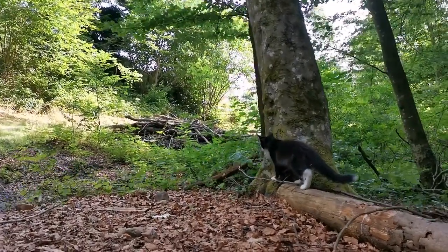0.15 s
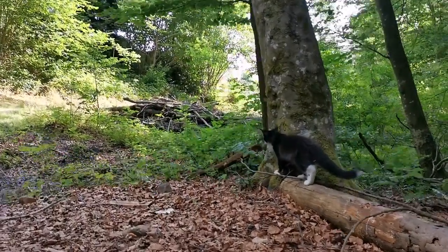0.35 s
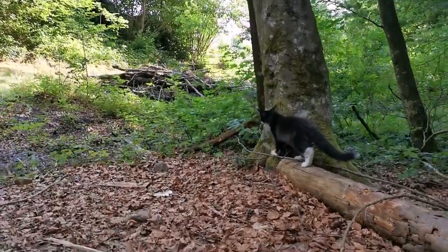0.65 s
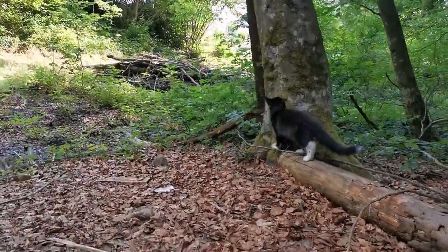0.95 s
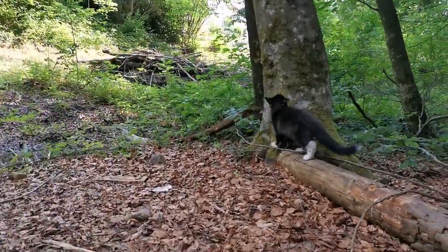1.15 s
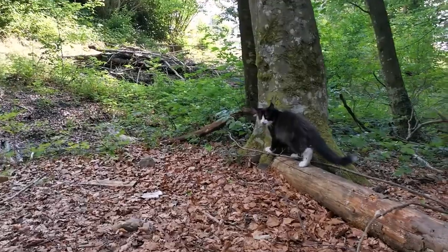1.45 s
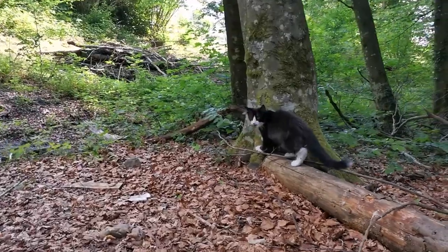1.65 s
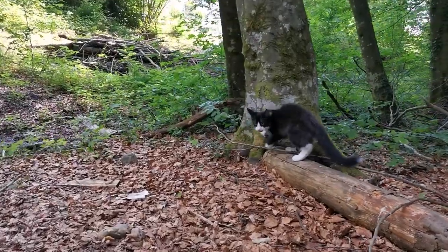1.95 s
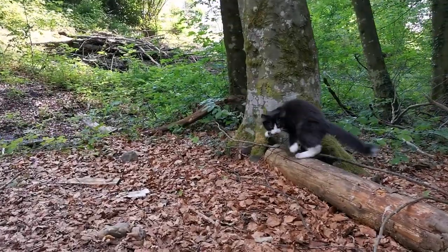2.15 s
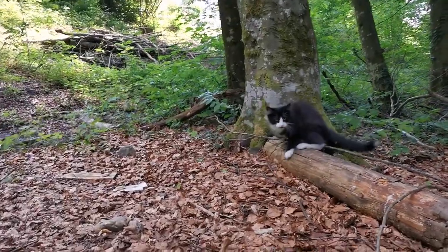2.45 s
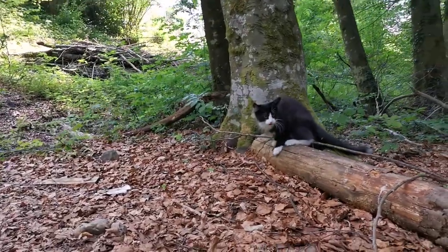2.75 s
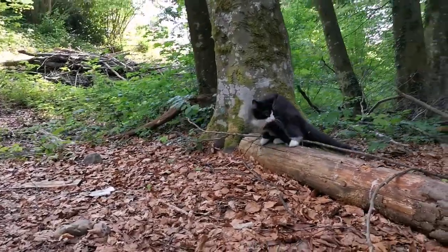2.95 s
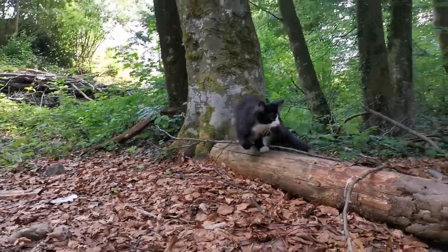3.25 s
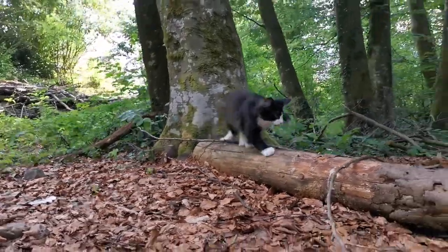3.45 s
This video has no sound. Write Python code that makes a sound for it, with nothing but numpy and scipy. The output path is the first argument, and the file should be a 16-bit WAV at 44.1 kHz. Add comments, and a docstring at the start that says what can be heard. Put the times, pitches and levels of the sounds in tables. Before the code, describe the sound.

Songbird chirping and whistling echoes through a wood, with dry leaf rustles and sharp snaps close by.

```python
"""A wood in light wind: from the start songbirds whistle, their notes smeared by echoes off the trunks.
A few hand knocks on the microphone case come early, and one more near the end.
Feet shift in dry leaves, with rustle, dull pops and sharp snaps; the snaps are strongest late on,
when the bird notes have thinned out. Birds are gliding sines; leaves are filtered clicks and bursts;
pops and knocks are fading sines; wind and hush are filtered noise."""
import sys
import numpy as np
from scipy import signal
from scipy.fft import rfft, irfft
from scipy.io import wavfile

SR = 44100
rng = np.random.default_rng(int(sys.argv[2]) if len(sys.argv) > 2 else 0)


def wrap_up_sound(samples):
    """Save the sound to the file named by the first command line argument, as 16-bit audio."""
    columns = np.atleast_2d(samples).T
    # keep every value between -1 and 1, then stretch to whole-number steps
    tamed = np.clip(columns, -1, 1)
    steps = np.round(tamed * 32767).astype(np.int16)
    wavfile.write(sys.argv[1], SR, steps)


N = 158760  # samples, 3.6 s
PORT_LAG_S = 0.00011  # extra travel time to the farther microphone port


def amp(db):
    """Turn decibels into a plain multiplier."""
    return 10 ** (np.asarray(db) / 20)


def rms_one(x):
    """Scale a sound to an average (rms) strength of 1."""
    return x / np.sqrt(np.mean(x ** 2) + 1e-20)


def in_time(rows):
    """Join the points of a table with straight lines, one curve per column."""
    s, *columns = np.transpose(rows)
    times = np.arange(N) / SR
    return [np.interp(times, s, column) for column in columns]


def colour(x, spectrum, share=1.0, size=8192):
    """Filter with the given (Hz, dB) shape, never sounding before its input (minimum phase)."""
    hz, db = np.transpose(spectrum)
    grid = np.arange(size // 2 + 1) * SR / size + 1
    log_gain = share * np.interp(np.log(grid), np.log(hz), db) * np.log(10) / 20
    # folding the cepstrum forward in time gives the minimum phase
    cepstrum = irfft(log_gain)
    cepstrum[1:size // 2] *= 2
    cepstrum[size // 2 + 1:] = 0
    impulse = irfft(np.exp(rfft(cepstrum)))
    return signal.fftconvolve(np.atleast_2d(x), impulse[None], axes=1)[:, :N]


def lagged(x, lag_s):
    """Make a stereo pair in which the left port hears lag_s later than the right."""
    hz = np.arange(len(x) // 2 + 1) * SR / len(x)
    turn = np.exp(-1j * np.pi * hz * lag_s * np.array([[1], [-1]]))
    return irfft(rfft(x) * turn, len(x))


def drift(rate):
    """Random wandering of spread 1, made by smoothing noise above about rate Hz."""
    r = np.exp(-2 * np.pi * rate / SR)
    noise = rng.standard_normal(N + SR)
    return rms_one(signal.lfilter([1], [1, -2 * r, r * r], noise)[SR:])  # drop the settling second


def add(out, s, sound):
    """Mix a sound into out, starting at s seconds."""
    i = int(max(s, 0) * SR)
    out[..., i:i + sound.shape[-1]] += sound[..., :N - i]


def fading(t60, count):
    """Steady decay that falls 60 dB in t60 seconds."""
    return amp(-60 * np.arange(count) / SR / t60)


# loudness of the far hush, before it wavers: t/s, level/dB
HUSH_LEVEL = [(0, -58.5), (.2, -58), (.5, -60.5), (1.0, -61.5), (1.9, -57.5), (2.1, -60.5), (2.5, -56),
              (3.0, -58.5), (3.6, -58.5)]
# tone of the far hush: f/Hz, level/dB (per Hz)
HUSH_TONE = [(60, -30), (100, -4.5), (300, -11), (700, -13), (1600, -17.5), (2400, -12.5), (3600, -8),
             (4400, -23.5), (5200, -12), (7000, -19.5), (8200, -35), (9500, -51), (12000, -58),
             (14400, -37), (16000, -58)]
HUSH_WAVER_DB, HUSH_WAVER_RATE_HZ = 3.1, 3


def hush():
    """Far hush of the wood: filtered noise, partly shared by both ports, wavering slowly in level."""
    white = rng.standard_normal((3, N))
    mixed = 1.01 * lagged(white[0], -PORT_LAG_S) + 0.56 * white[1:]
    level_db = in_time(HUSH_LEVEL)[0] + HUSH_WAVER_DB * drift(HUSH_WAVER_RATE_HZ)
    return amp(level_db) * rms_one(colour(mixed, HUSH_TONE))


# loudness of the wind on the ports: t/s, level/dB
WIND_LEVEL = [(0.0, -59), (0.13, -56), (0.17, -48.5), (0.38, -57), (0.42, -56), (0.44, -48), (0.47, -60),
              (0.53, -61.5), (0.63, -45.5), (0.67, -59.5), (1.11, -62), (1.13, -48.5), (1.36, -68),
              (1.5, -52), (2.19, -68), (2.31, -46), (2.4, -62), (2.52, -48), (2.76, -71), (2.9, -52),
              (3.25, -53.5), (3.42, -74), (3.45, -49.5), (3.6, -60.5)]
# tone of the wind on the ports: f/Hz, level/dB (per Hz)
WIND_TONE = [(15, -10.5), (30, 2.5), (70, 6), (130, -3), (250, -16.5), (600, -74)]


def wind():
    """Wind lumps at the ports: low rumbling noise, partly shared and partly each port's own."""
    white = rng.standard_normal((3, N))
    mixed = white[0] + 0.82 * white[1:]
    return amp(in_time(WIND_LEVEL)[0]) * rms_one(colour(mixed, WIND_TONE))


# hand knocks on the case: t/s, level/dB, level/dB of the thump relative to that
HAND_KNOCKS = [(0.063, -35, -16), (0.309, -32, -13), (0.413, -17.5, -4), (3.456, -47, 4)]
# ringing tones of the case: f/Hz, level/dB, time to fall 60 dB t/s
CASE_TONES = [(165, -9.5, 0.037), (293, -2, 0.036), (582, 11.5, 0.019), (1140, 3, 0.016), (2180, -10, .01)]
THUMP_HZ, THUMP_T60_S, THUMP_PHASE_S = 75, 0.11, 0.0052  # the last one only shifts the wave's phase
KNOCK_LEFT_DB, KNOCK_RISE_S = -8, 0.0032  # knocks are weaker on the left


def knocks():
    """A hand knock makes the case ring at several fading tones, over one deep fading thump."""
    out, t = np.zeros((2, N)), np.arange(6000) / SR
    ring = np.zeros(len(t))
    for hz, db, t60 in CASE_TONES:
        ring += amp(db) * np.sin(2 * np.pi * hz * t) * fading(t60, len(t))
    thump = np.sin(2 * np.pi * THUMP_HZ * (t - THUMP_PHASE_S)) * fading(THUMP_T60_S, len(t))
    rise = 1 - np.exp(-(t / KNOCK_RISE_S) ** 3)
    for s, db, thump_db in HAND_KNOCKS:
        sides = amp(db + np.array([[KNOCK_LEFT_DB], [0]]))
        add(out, s, sides * (ring + amp(thump_db) * thump) * rise)
    return out


# dull pops in the litter: t/s, level/dB before rise and fade, f/Hz
LITTER_POPS = [(1.001, -44, 1710), (1.373, -30, 530), (1.48, -28, 1610), (1.552, -20, 850),
               (1.596, -28, 1480), (1.606, -35, 1060), (1.64, -18, 1030), (1.695, -22, 1670),
               (2.182, -28.5, 1400), (2.334, -26.5, 1760), (2.945, -35.5, 335), (3.091, -20.5, 1400),
               (3.132, -32, 520)]
POP_CYCLES, POP_RISE_S = 4.8, 0.00041  # a pop falls 60 dB in this many cycles


def pops():
    """A dull pop in the litter is a tone that dies within a few cycles, alike on both sides."""
    out, t = np.zeros((2, N)), np.arange(6000) / SR
    rise = 1 - np.exp(-t / POP_RISE_S)
    for s, db, hz in LITTER_POPS:
        tone = np.sin(2 * np.pi * hz * t) * fading(POP_CYCLES / hz, len(t))
        add(out, s, amp(db) * tone * rise)
    return out


GRAIN_SPREAD_DB, CLUMP_DB, CLUMP_RATE_HZ = 3.5, 3.5, 17


def grains(rate, spectrum, own):
    """Clumped clicks of uneven size; "own" is the share of power that differs between the ports."""
    size_db = GRAIN_SPREAD_DB * np.minimum(rng.exponential(1, (3, N)), 5)
    sizes = amp(size_db) * rng.choice([-1, 1], (3, N))
    happens = rng.random((3, N)) < rate / SR
    clicks = sizes * happens * amp(CLUMP_DB * drift(CLUMP_RATE_HZ))
    shared = lagged(clicks[0], -PORT_LAG_S)  # reaches the left port first
    mixed = np.sqrt(1 - own) * shared + np.sqrt(own) * clicks[1:]
    return rms_one(colour(mixed, spectrum))


# rustle, before the boosts below: t/s, crisp leaf level/dB, dull litter level/dB
RUSTLE_LEVELS = [(0, -102, -83), (.3, -82, -78), (.5, -86.5, -78.5), (.62, -78.5, -75), (.72, -65.5, -61.5),
                 (.8, -77.5, -76.5), (.95, -81, -79.5), (1.27, -101, -79), (1.32, -59, -66.5),
                 (1.39, -71.5, -50.5), (1.43, -74, -65), (1.48, -65, -50), (1.53, -72, -64),
                 (1.62, -66.5, -52.5), (1.72, -70, -67), (1.8, -59, -68.5), (1.85, -72.5, -76),
                 (1.9, -86, -81), (2.2, -84.5, -75.5), (2.47, -75, -87), (2.57, -78, -80),
                 (2.64, -67, -56.5), (2.72, -84, -66.5), (2.8, -94, -71), (2.9, -74.5, -58.5),
                 (3.0, -67.5, -62), (3.1, -71, -57.5), (3.17, -70, -65), (3.27, -84, -74.5),
                 (3.4, -76.5, -73), (3.6, -73.5, -67.5)]
# tone of the crisp leaves: f/Hz, level/dB (per Hz)
LEAF_TONE = [(880, -23), (1500, -9), (2140, -10.5), (3180, -2.5), (4640, 0.5), (5490, -1), (7030, -6),
             (12100, -39.5), (14500, -33), (16000, -63)]
# tone of the dull litter: f/Hz, level/dB (per Hz)
LITTER_TONE = [(200, -37.5), (350, -7.5), (600, -7.5), (1200, -0.5), (1800, -0.5), (3000, -29.5),
               (6000, -29)]
LEAF_BOOST_DB, LITTER_BOOST_DB = 24, 8.5
LEAF_GRAINS_PER_S, LITTER_GRAINS_PER_S = 4000, 1500
LEAF_OWN_SHARE, LITTER_OWN_SHARE = 0.29, 0.05


def rustle():
    """Feet in dry leaves: a crowd of crisp leaf clicks on top, duller litter clicks below."""
    leaf_db, litter_db = in_time(RUSTLE_LEVELS)
    leaves = grains(LEAF_GRAINS_PER_S, LEAF_TONE, LEAF_OWN_SHARE)
    litter = grains(LITTER_GRAINS_PER_S, LITTER_TONE, LITTER_OWN_SHARE)
    return amp(leaf_db + LEAF_BOOST_DB) * leaves + amp(litter_db + LITTER_BOOST_DB) * litter


# snaps of leaves and twigs: t/s, level/dB, level/dB of the dull part relative to that
LEAF_SNAPS = [(0.0756, -41, -12), (0.1293, -30, -28), (0.5084, -27, -33), (0.5186, -30.5, -6),
              (0.5864, -39, -15), (0.8914, -33, -37), (1.4785, -24, -4), (1.5542, -17, -22),
              (1.6147, -42, -8.0), (1.6945, -41, -8.0), (1.7564, -27, -10), (2.184, -34, -5),
              (2.3659, -31.5, -4), (2.627, -25.5, -33), (2.9645, -16.5, -9.5), (2.9834, -22.5, -2),
              (2.9941, -25, -15), (3.0914, -29.5, -15), (3.1343, -19.5, -5), (3.1874, -27, -8.0),
              (3.2253, -24, -27), (3.275, -34, -14), (3.2785, -17, -6), (3.3011, -16.5, -5.5),
              (3.3065, -9.5, 2), (3.3283, -32.5, 7), (3.373, -34, 0), (3.4147, -33.5, 8.5),
              (3.5766, -31, 4)]
# tone of the snaps: f/Hz, level/dB (per Hz)
SNAP_TONE = [(150, -27), (250, -13), (597, -8.5), (906, -21), (1450, -7.5), (3400, -1), (4340, 2),
             (7190, -2), (8400, -22), (14200, -33.5), (16000, -36)]
SNAP_SPLIT_HZ = 4000  # the dull part lies below, the bright part above
SPLINTER_DB, SPLINTER_T60_S = -15, 0.0064
SNAP_TAIL_DB, SNAP_TAIL_T60_S = -46, 0.056
TURN_S = 2.9  # snaps come from the left before this time, from the right after it


def snaps():
    """A snap is a click, a few ms of splinter noise and a faint tail; how dull it is varies."""
    bright, dull = np.zeros((2, N)), np.zeros((2, N))
    noise = rng.standard_normal((len(LEAF_SNAPS), 2048))
    splinters = amp(SPLINTER_DB) * fading(SPLINTER_T60_S, 2048)
    tail = amp(SNAP_TAIL_DB) * fading(SNAP_TAIL_T60_S, 2048)
    click_peak = abs(colour(np.eye(1, 64), SNAP_TONE)).max()
    for (s, db, dull_db), burst in zip(LEAF_SNAPS, noise):
        burst = burst * (splinters + tail)
        burst[0] = -1  # the click itself
        lag_s = PORT_LAG_S * np.sign(s - TURN_S)
        pair = lagged(np.roll(burst, 16), lag_s) / click_peak  # 16 samples of room for the lag
        add(bright, s, amp(db) * pair)
        add(dull, s, amp(db + dull_db) * pair)
    high = signal.butter(2, SNAP_SPLIT_HZ, "high", fs=SR, output="sos")
    low = signal.butter(2, SNAP_SPLIT_HZ, "low", fs=SR, output="sos")
    # subtracting keeps the two parts in step at the split
    return colour(signal.sosfilt(high, bright) - signal.sosfilt(low, dull), SNAP_TONE)


# bird notes: t/s, length t/s, start f/Hz, end f/Hz, warble depth f/Hz,
# level/dB before echoes, left minus right level/dB
BIRD_NOTES = [(0, 0.058, 3050, 3050, 30, -51.5, 5.5), (0, 0.092, 2450, 2418, 20, -61.5, -11),
              (0.067, 0.056, 3550, 2900, 30, -60, -4), (.13, 0.069, 3520, 3450, 30, -64, 7),
              (0, 0.16, 5000, 5300, 120, -70, -6), (.155, 0.063, 2950, 2800, 30, -61.5, 10),
              (0.201, 0.089, 7300, 6600, 500, -43.5, 2.5), (0.274, 0.078, 4000, 4050, 40, -53.5, 1.5),
              (.355, 0.023, 4180, 3650, 30, -48, 0), (0.373, 0.1, 3590, 3550, 30, -61.5, 7),
              (0.467, .06, 2433, 3150, 30, -59, -1), (0.527, 0.049, 2766, 2630, 46, -58.5, 3),
              (0.538, 0.024, 4850, 4730, 40, -47, 7), (.565, 0.013, 5200, 4170, 46, -57, 5),
              (0.649, 0.033, 6500, 4900, 30, -43.5, 1), (0.701, 0.034, 4850, 3900, 40, -47, 4),
              (0.787, 0.036, 6600, 5100, 17, -39.5, -1), (0.821, .011, 5700, 7300, 40, -42, 8),
              (0.837, 0.028, 4800, 4500, 40, -42, 0), (0.864, 0.026, 4300, 3700, 28, -43.5, 4),
              (0.943, 0.026, 6900, 5000, 40, -35.5, -2), (0.967, .011, 5970, 7300, 31, -41, 6.5),
              (0.985, 0.029, 4750, 4600, 43, -40.5, 1), (1.007, 0.0256, 4400, 3700, 29, -38.5, 3),
              (1.051, .014, 6200, 7200, 37, -45, 3), (1.103, .045, 4500, 2700, 80, -40, -1.5),
              (1.11, 0.055, 1900, 1900, 19.3, -64, -6), (1.125, 0.011, 5800, 7000, 40, -46.5, 4),
              (1.15, 0.2, 2000, 2020, 20, -52.5, -2.5), (1.164, 0.042, 2800, 3300, 93, -39.5, 0.5),
              (1.212, .011, 5550, 7200, 40, -43.5, 8), (1.24, 0.043, 5200, 3490, 100, -38.5, 2.5),
              (1.283, 0.061, 3400, 2800, 44, -40, -1), (1.291, 0.011, 6300, 7300, 40, -45, 6),
              (1.388, 0.046, 4900, 3000, 140, -37, 0.5), (1.431, .07, 2950, 3200, 120, -40, 0),
              (1.546, 0.029, 5500, 4000, 29, -47, 0), (1.565, 0.14, 4194, 3850, 260, -44, 4),
              (1.436, 0.1, 4300, 3875, 150, -46, 5), (1.58, 0.12, 3200, 3100, 180, -40.5, 0),
              (1.689, 0.055, 4150, 4250, 60, -44, 6), (1.734, 0.0418, 3700, 3200, 33, -41.5, 6),
              (1.8, .05, 3150, 3200, 56, -45.5, 5.5), (1.874, .06, 2750, 2005, 130, -47.5, 3),
              (1.948, 0.057, 1980, 2050, 30, -53.5, -7), (1.956, 0.1, 2950, 3400, 120, -40.5, 5),
              (1.994, 0.056, 7500, 7600, 40, -63, 5), (2.06, 0.08, 7400, 7100, 60, -60.5, 2),
              (2.104, 0.029, 4800, 5000, 74, -40.5, 2), (2.127, 0.024, 5400, 3900, 160, -36.5, 1),
              (2.148, 0.055, 4233, 3100, 260, -38, -1), (2.197, 0.073, 3300, 3650, 130, -44.5, 2.5),
              (2.316, 0.11, 5200, 5300, 850, -43.5, -0.5), (2.47, 0.037, 3600, 2500, 160, -50, -7),
              (2.57, 0.088, 4100, 4400, 290, -43.5, 2.5), (2.577, 0.073, 7200, 6700, 490, -43, 2),
              (2.437, 0.023, 7500, 7500, 40, -72, 6), (2.64, .1, 2404, 2350, 40, -59.5, -5),
              (2.838, 0.047, 3350, 3350, 40, -67, 3), (2.946, 0.09, 4300, 4100, 200, -75, 3),
              (3.0, .16, 5450, 5500, 100, -52, -9), (3.2, 0.057, 5500, 5450, 60, -49.5, -10)]
GLIDE_BEND = 1.7  # above 1, glides slow down towards their end
WARBLE_PER_S, WAVER_HZ, WAVER_RATE_HZ = 140, 35.3, 61.8
NOTE_EDGE = 0.24  # share of the note spent rising, and again falling


def whistles():
    """Each bird note is a sine gliding from one pitch to another, with a warble and random waver."""
    out = np.zeros((2, N))
    phases = rng.uniform(0, 2 * np.pi, len(BIRD_NOTES))
    waver = WAVER_HZ * drift(WAVER_RATE_HZ)
    for (s, length, from_hz, to_hz, warble_hz, db, pan_db), phase in zip(BIRD_NOTES, phases):
        u = np.arange(int(length * SR)) / (length * SR)  # 0 to 1 through the note
        glide = to_hz + (from_hz - to_hz) * (1 - u) ** GLIDE_BEND
        warble = warble_hz * np.sin(2 * np.pi * WARBLE_PER_S * length * u + phase)
        hz = glide + warble + waver[int(s * SR):][:len(u)]
        edge = np.sin(np.pi / 2 * np.clip(np.minimum(u, 1 - u) / NOTE_EDGE, 0, 1))
        sides = amp(db + pan_db * np.array([[0.5], [-0.5]]))
        add(out, s, sides * edge * np.sin(2 * np.pi * np.cumsum(hz) / SR))
    return out


TRUNKS_T60_S, TRUNKS_BUILD_S = 0.74, 0.006
NEAR_TRUNKS_T60_S, NEAR_TRUNKS_DB = 0.071, 1


def trunk_echo():
    """Echoes off many trunks act like fading noise: a short near part and a long far part."""
    far = fading(TRUNKS_T60_S, SR)
    near = amp(NEAR_TRUNKS_DB) * fading(NEAR_TRUNKS_T60_S, SR)
    build = 1 - np.exp(-np.arange(SR) / SR / TRUNKS_BUILD_S)
    echo = rng.standard_normal((2, SR)) * (far + near) * build
    return echo / np.sqrt((echo ** 2).sum(axis=1, keepdims=True))


DIRECT_DB = -7


def birds():
    """Whistles heard a little directly, later at the right port, and mostly as trunk echoes."""
    notes = whistles()
    late = int(round(PORT_LAG_S * SR))
    direct = np.array([notes[0], np.roll(notes[1], late)])
    echoes = signal.fftconvolve(notes, trunk_echo(), axes=1)[:, :N]
    return amp(DIRECT_DB) * direct + echoes


def scene():
    """The birds, the footsteps and hand knocks close by, and the wood's air, all added together."""
    return birds() + rustle() + snaps() + pops() + knocks() + wind() + hush()


# tone contrast between the ports, used in part on each side: f/Hz, level/dB
PORT_CONTRAST = [(60, -9), (110, -7.0), (200, -3.5), (380, 0), (700, 0), (1290, 1.0), (2380, 7), (4400, -1),
                 (8120, 16.5), (15000, -11)]
CUTOFF_HZ = 16500  # from here up the sound is at least 70 dB down


def record(dry):
    """The two microphone ports colour the sound in opposite ways; a steep filter cuts the top."""
    left = colour(dry[0], PORT_CONTRAST, 0.58)
    right = colour(dry[1], PORT_CONTRAST, -0.35)
    top_cut = signal.cheby2(12, 70, CUTOFF_HZ, fs=SR, output="sos")
    return signal.sosfilt(top_cut, np.vstack([left, right]))


dry = scene()
out = record(dry)
wrap_up_sound(out)
```